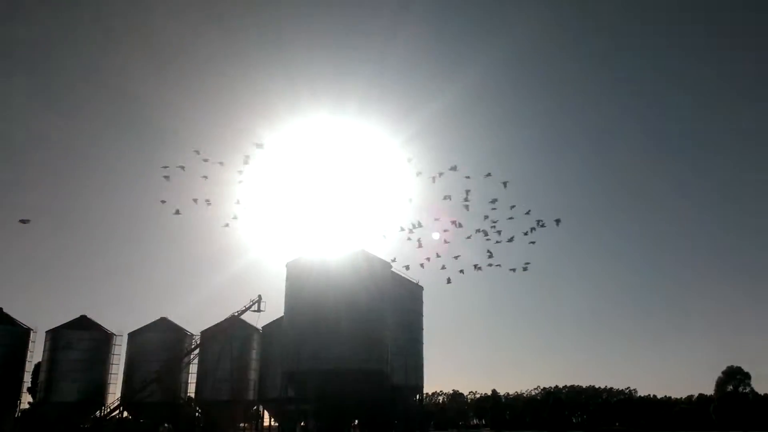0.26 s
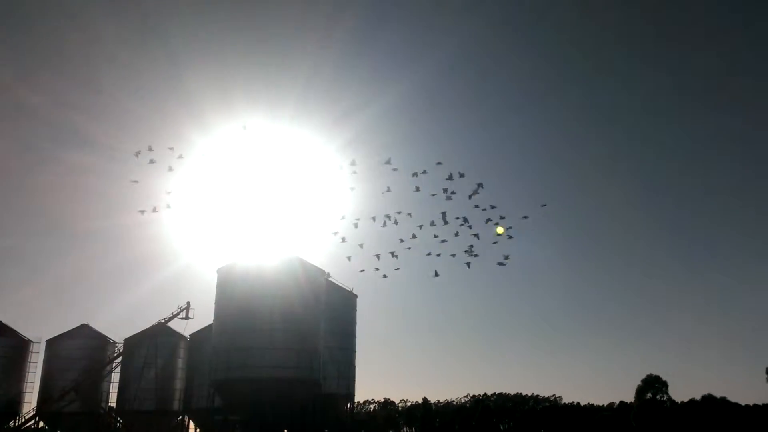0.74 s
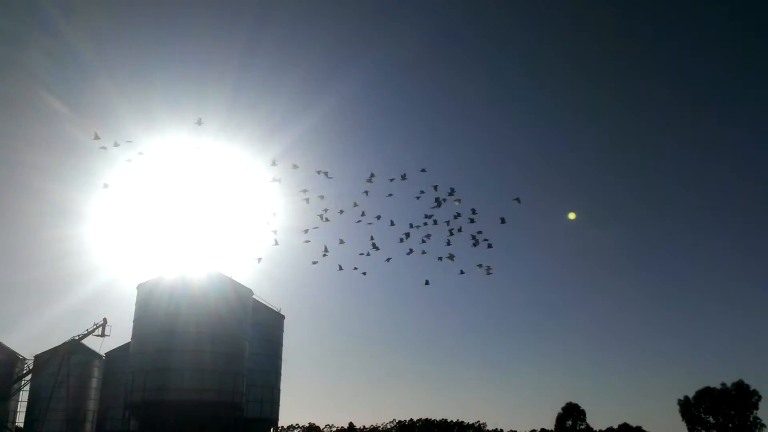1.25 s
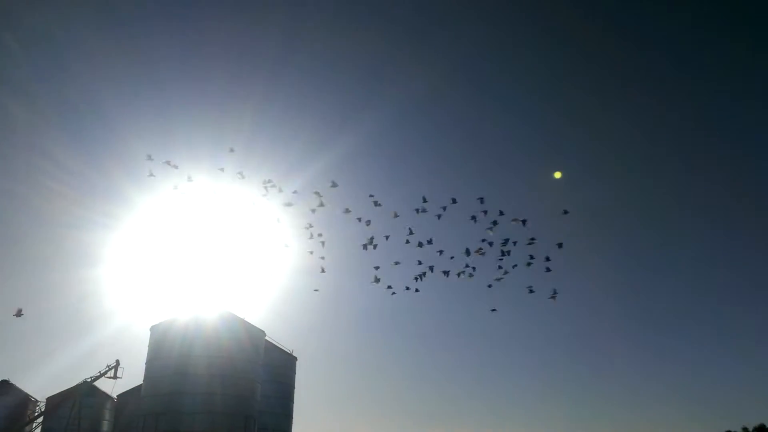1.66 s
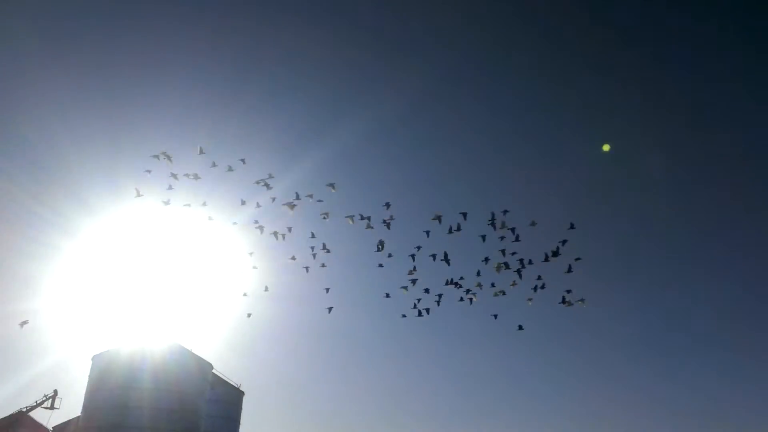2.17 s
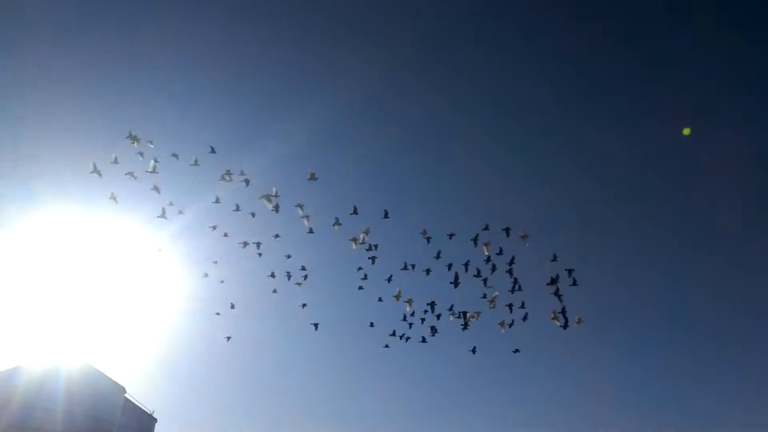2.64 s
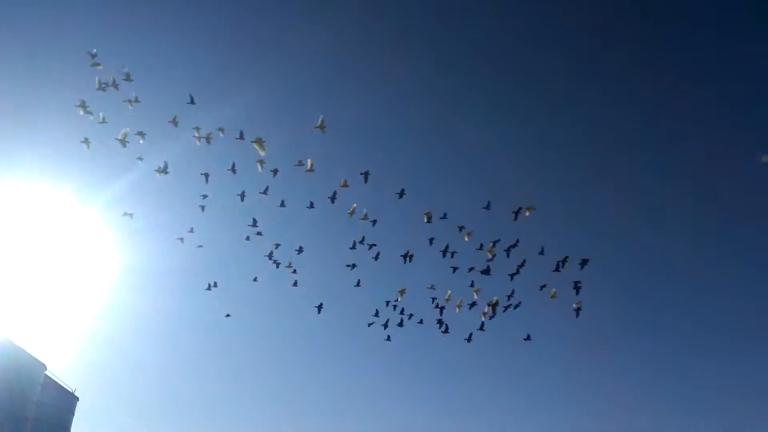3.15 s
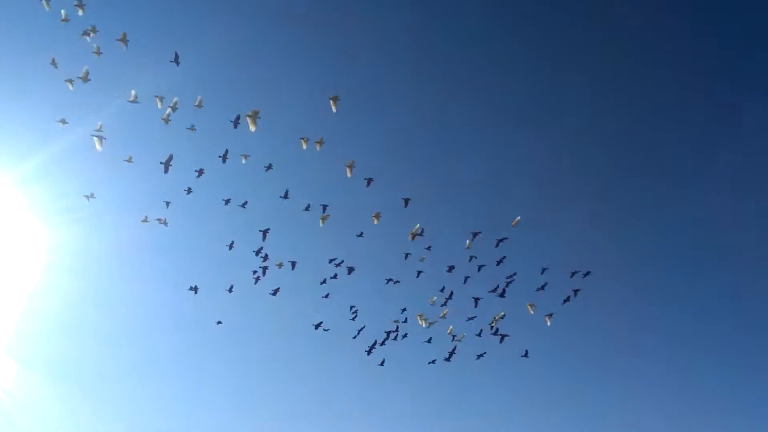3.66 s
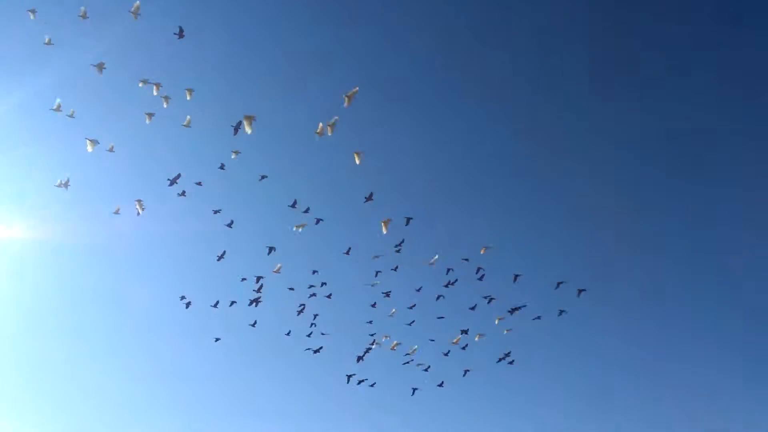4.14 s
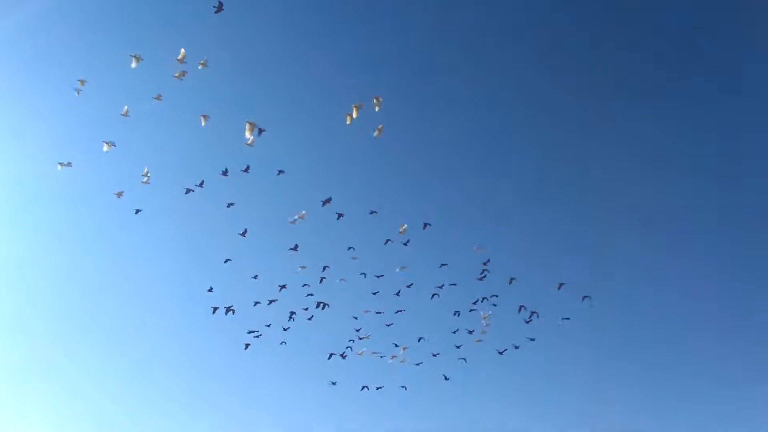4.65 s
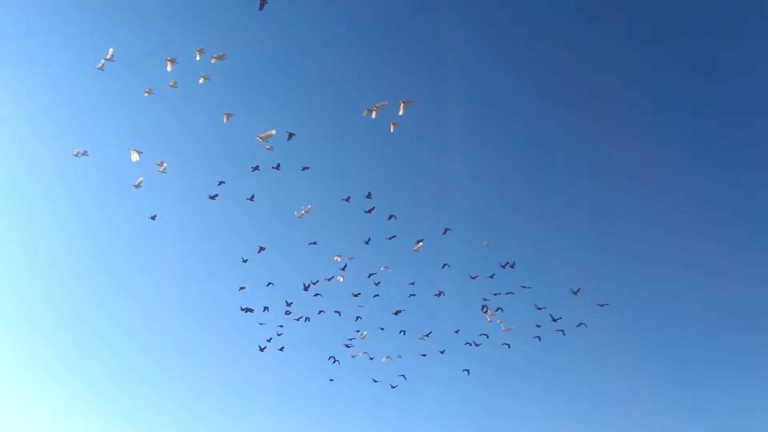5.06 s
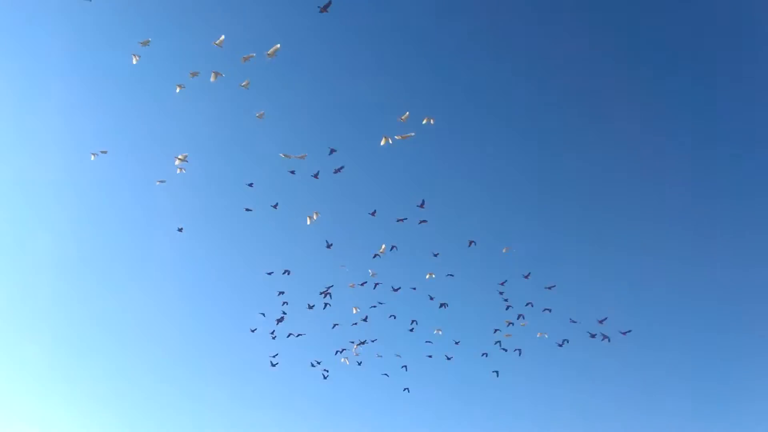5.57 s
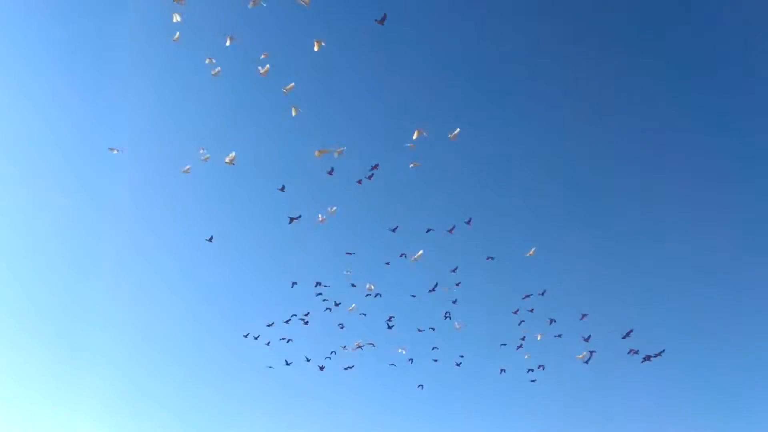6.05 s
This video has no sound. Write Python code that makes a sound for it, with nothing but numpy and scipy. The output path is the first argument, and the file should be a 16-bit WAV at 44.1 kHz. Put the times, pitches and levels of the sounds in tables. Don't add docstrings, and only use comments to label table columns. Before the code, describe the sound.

A dense flock of cockatoos calls continuously over open farmland, heard on a hand-held phone in gusty wind. From 0 s, quick high chirps, almost pure whistles, overlap with raspy, nasal squawks, while a distant crowd of both fills the gaps. Wind throbs and slaps the microphone in the first half second, then gusts hard at 0.9-1.4 s, with low fluttering rumble and blunt thumps. Faint handling ticks occur between 0.6 and 2.1 s. Around 2-2.5 s soft wing rustle lifts a little and another gust hits. From 2.7 to 3.8 s chirps cluster brightly against longer squawks as wind briefly eases near 3.2 s. Wind is strong again from 3.8 to 5.8 s, heaviest near 4.4 s, with sharp yelps around 5.1 and 5.8 s. It drops near 6 s, leaving chirps and squawks continuing to the abrupt end at about 6.3 s.

```python
import sys
import numpy as np
from scipy import signal
from scipy.fft import rfft, irfft, next_fast_len
from scipy.io import wavfile
from scipy.ndimage import uniform_filter1d

SR = 44100
rng = np.random.default_rng(int(sys.argv[2]) if len(sys.argv) > 2 else 0)


def inscribe(sig):
    pcm = np.round(np.clip(np.atleast_2d(sig).T, -1, 1) * 32767)
    wavfile.write(sys.argv[1], SR, pcm.astype(np.int16))


def ratio_of_db(decibels):
    return 10 ** (np.asarray(decibels, float) / 20)


N = 278209


def colour(x, points):
    hz, db = np.transpose(points)
    size = next_fast_len(N)
    log_hz = np.log(np.arange(1, size // 2 + 2) * SR / size)
    gain = ratio_of_db(np.interp(log_hz, np.log(hz), db))
    return irfft(rfft(x, size) * gain, size)[:N]


def unit(x):
    return x / np.sqrt(np.mean(x ** 2))


def noise(points):
    return unit(colour(rng.standard_normal(N), points))


def high_pass(x, order, cut_hz):
    return signal.sosfilt(signal.butter(order, cut_hz, "high", fs=SR, output="sos"), x)


def walk(rate_hz):
    hold = int(SR / rate_hz)
    held = np.repeat(rng.standard_normal(N // hold + 1), hold)
    slewed = uniform_filter1d(uniform_filter1d(held, hold), hold)
    return unit(slewed[:N])


def add(out, start_s, call, lag_s, bounce):
    for at_s, gain in ((start_s, 1), (start_s + lag_s, bounce)):
        i = int(at_s * SR)
        out[max(i, 0):max(i + len(call), 0)] += gain * call[max(-i, 0):max(N - i, 0)]


def machinery():
    # frequency in Hz, level in dB.
    drone = [(40, -18), (110, 10), (200, -2.5), (400, -41.5)]
    return ratio_of_db(-48) * noise(drone)


def hand_ticks():
    # start in seconds, peak level in dB.
    ticks = [
        (0.605, -55),
        (1.0051, -60.5),
        (1.8322, -52),
        (2.0887, -57),
    ]
    decay_s, cut_hz = .0006, 7000
    out, t = np.zeros(N), np.arange(200) / SR
    for s, db in ticks:
        burst = rng.standard_normal(len(t)) * np.exp(-t / decay_s)
        add(out, s, ratio_of_db(db + 9) * burst, 0, 0)
    return high_pass(out, 2, cut_hz)


def swish():
    # frequency in Hz, level in dB.
    feathers = [(6000, -30), (9500, -1), (13000, 0), (15600, -12)]
    peak_s, width_s, level_db = 0.44, 0.085, -59
    bell = np.exp(-((np.arange(N) / SR - peak_s) / width_s) ** 4)
    return ratio_of_db(level_db) * bell * noise(feathers)


def wings(wing_db):
    # frequency in Hz, level in dB.
    rustle = [(2000, -24), (5500, 2), (8000, -10), (11000, -24), (13000, -32), (15600, -33)]
    source, out = colour(rng.standard_normal(N), rustle), 0
    for hz in (3000, 6000, 8500, 11000, 13500):
        band = colour(source, [(hz / 1.6, -40), (hz / 1.15, 0), (hz * 1.15, 0), (hz * 1.6, -40)])
        out = out + band * ratio_of_db(3 * walk(12) + 2.8 * walk(40))
    return ratio_of_db(wing_db + 17) * unit(out)


def gusts():
    # peak in seconds, width in seconds, peak level in dB, bright edge in dB.
    swells = [(0.0, 0.057, -22.5, 4.5), (0.212, 0.015, -19.5, 9.5), (0.281, 0.19, -26, 5.5),
              (0.59, 0.97, -29, -37.5), (0.751, 0.17, -29, 4), (0.931, 0.061, -17.5, 0),
              (1.048, 0.06, -19, -3), (1.249, 0.11, -15.5, 2), (1.371, 0.23, -20.5, -8),
              (1.67, 0.12, -21.5, -7.5), (1.836, 0.044, -21, -7), (2.087, 0.28, -27.5, -0.5),
              (2.32, 0.2, -20, 0), (2.526, 0.063, -24, -0.5), (2.795, 0.3, -24.5, -8),
              (3.202, 0.16, -30.5, -9), (3.4, 0.052, -20, -35), (3.599, 0.24, -22.5, -12),
              (3.902, 0.26, -18.5, -4.5), (4.134, 0.17, -18, -7.5), (4.355, 0.11, -16, -6),
              (4.501, 0.19, -15, -4), (4.81, 0.41, -18.5, -10.5), (5.111, 0.19, -19, -11),
              (5.388, 0.19, -17, -7), (5.678, 0.42, -20, -4.5), (6.086, 0.13, -29, -10)]
    calm_db, calm_edge_db = -34, -43
    t = np.arange(N) / SR
    low, bright = ratio_of_db(2 * calm_db), ratio_of_db(2 * (calm_db + calm_edge_db))
    for s, width_s, db, edge_db in swells:
        bell = ratio_of_db(2 * db) * np.exp(-(2 * (t - s) / width_s) ** 2)
        low = low + bell
        bright = bright + ratio_of_db(2 * edge_db) * bell
    return 10 * np.log10(low) + 1.0, 10 * np.log10(bright / low)


def slaps():
    # start in seconds, peak level in dB, ring in Hz.
    eddies = [(0.176, -8, 405), (0.197, -3.5, 553), (0.22, -4, 455), (0.255, -4, 720), (0.277, -21, 525),
              (0.299, -7, 734), (0.324, -2.5, 740), (0.372, -5.5, 537), (0.535, -10.5, 540),
              (0.744, -3.5, 540), (0.774, -4.5, 950), (0.898, -3.5, 616), (1.164, -7.5, 665),
              (1.259, -2, 580), (2.242, -4, 530), (2.298, -7, 685), (2.759, -10, 580), (3.624, -7, 403),
              (3.856, -0.5, 534), (3.94, -4, 656), (4.102, -5.5, 410), (4.415, -2, 400), (4.478, -4, 665),
              (4.515, -0.5, 480), (4.602, -9, 490), (4.648, -3, 490), (5.139, -4.5, 472),
              (5.555, -10.5, 855), (5.609, -6, 560), (5.688, -5, 523), (0.667, -6.5, 525),
              (0.732, -16, 550), (0.905, -6.5, 880), (1.194, -0.5, 503), (1.212, -9, 596), (1.292, -6, 640),
              (1.357, -10, 406), (1.395, -26, 352), (1.543, -15, 490), (2.338, -11, 397),
              (2.377, -3.5, 540), (3.406, -14, 350), (3.831, -3, 430), (3.982, -5.5, 433), (4.627, -5, 427),
              (4.724, -3, 397), (4.78, -13, 463), (5.344, -15, 344), (5.422, -4, 363), (0.008, -4, 600),
              (0.03, -6.5, 356), (4.325, -9, 447), (4.362, -3.5, 563), (4.38, -4, 700), (4.537, -11, 730),
              (5.302, -3.5, 323), (5.465, -5, 580), (5.58, -8, 484), (1.678, -10, 500), (1.806, -10.5, 430)]
    rise_cycles, decay_cycles = .3, 1.37
    out, t = np.zeros(N), np.arange(int(.02 * SR)) / SR
    for s, db, hz in eddies:
        cycles = t * hz
        envelope = np.exp(-cycles / decay_cycles) * np.minimum(1, cycles / rise_cycles)
        add(out, s, ratio_of_db(db + 2.5) * np.sin(2 * np.pi * cycles) * envelope, .0035, -.6)
    return colour(out, [(100, -34), (350, -9.5), (900, -3), (1800, -9), (2100, -18), (3000, -60)])


def wind(gust_db, edge_db):
    # frequency in Hz, level in dB per Hz.
    rumble_points = [(15, -65), (25, 16), (64, -21.5), (165, -2.5), (361, 1.5), (502, -3.5), (574, -4.5),
                     (647, -8.5), (900, -20.5), (1170, -33), (1980, -120)]
    # frequency in Hz, level in dB.
    edge_points = [(500, 2), (900, 2), (1400, -11), (1950, -20), (2100, -51)]
    eddies = 1.6 * np.tanh(walk(70) / 1.6)
    rumble = noise(rumble_points) * ratio_of_db(2.26 * eddies + 0.95 * walk(25.16))
    edge = noise(edge_points) * ratio_of_db(3.3 * eddies + 11.0 * np.tanh(walk(160) / 2.2))
    rumble = ratio_of_db(gust_db - 2.5) * unit(rumble)
    edge = ratio_of_db(gust_db + edge_db - 6.0) * unit(edge)
    return rumble + edge + slaps()


def squawks(rows, waver, rasp_db, count=17):
    # frequency in Hz, level in dB.
    throat = [(600, -32.5), (1300, -5), (1600, -11), (1950, -12.5), (2150, 0), (2700, 0), (3200, -1),
              (4000, -2.5), (4800, -2), (5500, -11), (6200, -16), (8200, -22), (10000, -43), (13000, -76)]
    wobble = 1.8 * walk(34) + .85 * walk(500)
    rasp = walk(200)
    out = np.zeros(N)
    for (s, length_s, start_hz, middle_hz, end_hz, db), (a, b) in zip(rows, rng.random((len(rows), 2))):
        u = np.linspace(0, 1, int((length_s + 0.015) * SR))
        pick = int(a * (N - len(u))) + np.arange(len(u))
        arch_hz = np.polyval(np.polyfit([0, .5, 1], [start_hz, middle_hz, end_hz], 2), u)
        hz = arch_hz * (1 + waver * wobble[pick])
        half = np.pi * (np.cumsum(hz) / SR % 1)
        pulses = np.sin((2 * count + 1) * half) / (np.sin(half) + 1e-9) - 1
        swell = np.minimum(1, np.minimum(u / 0.14, (1 - u) / 0.17))
        call = ratio_of_db(db + rasp_db * rasp[pick]) * swell * pulses / np.sqrt(2)
        add(out, s - .008, call, .00025 + .0012 * b, .7)
    return colour(out, throat)


def chirps(rows, overtone_db, warble, throb):
    # frequency in Hz, level in dB.
    beak = [(6000, -17), (7000, 4.5), (7700, 2.5), (8600, -11.5), (9700, -4.5), (11500, -18), (14000, -29)]
    hook = 0.029
    out, over = np.zeros(N), np.zeros(N)
    for (s, length_s, start_hz, end_hz, db), (a, b, c) in zip(rows, rng.random((len(rows), 3))):
        u = np.linspace(0, 1, int((length_s + 0.00842) * SR))
        flutter = np.sin(2 * np.pi * ((60 + 200 * a) * u * length_s + b))
        glide_hz = start_hz + (end_hz - start_hz) * u ** 1.388
        hz = glide_hz * (1 + hook * (np.sin(np.pi * u) - .5) + warble * flutter)
        phase = 2 * np.pi * np.cumsum(hz) / SR
        swell = ratio_of_db(db - 7.5) * np.sin(np.pi * u) ** 0.43 * (1 + throb * flutter)
        add(out, s - .004, swell * np.sin(phase), 0.000976 + .006 * c, .4)
        overtones = np.sin(2 * phase) + ratio_of_db(-6) * np.sin(3 * phase)
        add(over, s - .004, ratio_of_db(11.6 * (c - 1.0)) * swell * overtones, .001 + .006 * c, .3)
    return out + ratio_of_db(overtone_db) * colour(over, beak)


def large_crowd():
    # frequency in Hz, level in dB.
    far_thin = [(1200, -0.5), (1950, -2.5), (2200, -1), (3300, 0), (6000, -2.5)]
    s, length, pitch, bend, arch, far = rng.random((360, 6)).T
    s = (np.arange(len(s)) + 2 * s) / len(s) * (N / SR + .1) - .15
    hz = 730 + 210 * pitch ** 1.5
    start_hz, middle_hz, end_hz = hz * (1 - .12 * bend), hz * (1 + .07 * arch), hz * (1 - .14 * arch)
    rows = np.transpose([s, .035 + .09 * length, start_hz, middle_hz, end_hz, -14 * far])
    return colour(unit(squawks(rows, waver=.014, rasp_db=3.5)), far_thin)


def small_crowd(overtone_db):
    s, length, pitch, spread, glide, far, high = rng.random((1300, 7)).T
    s = (np.arange(len(s)) + 6 * s) / len(s) * N / SR - .04
    is_high = high < .3
    hz = np.where(is_high, 4250, 3290) + 480 * (pitch + spread)
    start_hz, end_hz = hz * (1 + 0.0348 * glide), hz * (1 - 0.231 * (glide - .3))
    length_s, db = 0.00948 + 0.02545 * length ** 2, -16 * far - 5.6 * is_high
    rows = np.transpose([s, length_s, start_hz, end_hz, db])
    return unit(chirps(rows, overtone_db, warble=.009, throb=.35))


def crowd(squawk_db, chirp_db, overtone_db):
    large, small = large_crowd(), small_crowd(overtone_db)
    return ratio_of_db(squawk_db + 1.5) * large + ratio_of_db(chirp_db - 1.5) * small


def near_squawks():
    # start in seconds, length in seconds, peak pitch in Hz, slide start to end in %, level in dB.
    long_low = [(0.033, 0.11, 745, 2.5, -43), (0.567, 0.073, 753, -2.5, -41), (0.659, 0.095, 784, -8, -39),
                (0.683, 0.2, 776, -2.5, -44), (1.031, 0.048, 785, 4.5, -34.5),
                (1.081, 0.17, 778, 1.5, -39.5), (1.319, 0.13, 756, -11, -40.5),
                (1.57, 0.14, 775, -4.5, -42.5), (1.663, 0.13, 830, 8, -40), (2.117, 0.15, 738, -0.5, -39.5),
                (2.305, 0.15, 737, -1, -38.5), (2.554, 0.11, 784, 3.5, -39.5),
                (2.735, 0.16, 810, -5.5, -37.5), (2.922, 0.16, 756, -3, -41.5),
                (3.031, 0.25, 797, 1.5, -39.5), (3.61, 0.35, 787, 1.5, -39), (1.902, 0.17, 797, -2.5, -38),
                (4.003, 0.3, 752, -11, -45), (4.73, 0.16, 845, -0.5, -36), (4.684, 0.26, 767, -5.5, -37),
                (5.335, 0.19, 785, -2, -40), (5.85, 0.17, 778, 2, -35), (5.926, 0.14, 739, -1, -42),
                (6.16, 0.14, 738, -2.5, -42)]
    # start in seconds, length in seconds, peak pitch in Hz, slide start to end in %, level in dB.
    short_high = [(0.201, 0.12, 880, 7.5, -40), (0.287, 0.035, 906, -10.5, -43), (0.322, 0.14, 963, 3, -39),
                  (2.446, 0.076, 913, 12, -34.5), (2.747, 0.13, 897, 5.5, -43),
                  (2.871, 0.13, 820, 2.5, -39), (3.108, 0.11, 886, -2.5, -39),
                  (3.193, 0.1, 864, 1.5, -35.5), (1.87, 0.09, 723, -3.5, -49),
                  (4.224, 0.14, 874, -0.5, -38), (4.996, 0.11, 906, 0.5, -38),
                  (5.128, 0.11, 898, 2.5, -34.5), (5.195, 0.075, 907, -6.5, -41),
                  (5.279, 0.13, 836, 10, -40.5), (5.384, 0.18, 864, -10, -37.5),
                  (5.764, 0.074, 852, 6, -32), (5.899, 0.059, 816, -5.5, -43), (1.216, 0.099, 866, 7, -39),
                  (1.435, 0.059, 930, 4.5, -43), (1.397, 0.062, 775, -9, -49),
                  (4.158, 0.047, 914, 2.5, -39), (4.31, 0.084, 734, 3, -38), (4.427, 0.06, 729, -7, -39),
                  (5.976, 0.092, 978, -1.5, -39), (6.249, 0.057, 890, 0.5, -35)]
    arch = 0.03
    rows = []
    for s, length_s, hz, slide, db in long_low + short_high:
        start_hz, end_hz = hz * (1 - arch - slide / 200), hz * (1 - arch + slide / 200)
        rows.append((s, length_s, start_hz, hz, end_hz, db))
    return squawks(rows, waver=.011, rasp_db=3)


def near_chirps(overtone_db):
    # start in seconds, start pitch in Hz, level in dB.
    level = [(0.443, 3625, -26), (0.556, 4010, -15.5), (0.598, 4020, -17), (0.636, 3784, -17),
             (0.97, 4820, -17), (0.993, 4120, -11.5), (1.004, 3600, -13.5), (1.237, 3600, -42),
             (1.25, 4070, -15), (1.283, 4060, -33), (2.319, 4010, -23), (2.382, 3800, -24),
             (2.451, 4060, -15), (2.745, 4240, -15.5), (2.777, 4070, -32), (3.049, 4070, -14),
             (3.215, 3800, -12), (3.274, 3820, -12), (3.438, 3780, -14.5), (3.691, 3970, -29),
             (3.748, 3967, -8), (4.099, 3654, -13.5), (4.205, 4200, -15), (4.24, 3710, -16),
             (4.267, 3760, -27), (4.593, 3800, -23), (4.628, 3930, -16), (5.999, 3930, -31),
             (6.068, 3896, -19)]
    # start in seconds, start pitch in Hz, level in dB.
    falling = [(0.782, 3580, -15.5), (1.198, 4150, -17), (1.385, 3730, -16), (1.525, 3730, -17.5),
               (1.907, 4070, -14), (2.028, 3800, -46), (2.105, 3600, -15.5), (2.118, 4150, -17),
               (2.365, 4400, -13), (2.551, 4000, -14), (3.725, 4240, -11), (4.814, 3960, -39),
               (4.997, 3860, -14), (5.116, 3930, -17), (5.453, 4130, -17.5), (5.832, 4110, -15.5),
               (6.052, 4350, -16)]
    # start in seconds, start pitch in Hz, level in dB.
    rising = [(0.289, 3540, -22), (0.303, 3740, -15), (0.361, 3980, -18), (1.031, 4010, -12),
              (1.066, 4200, -16.5), (1.339, 3580, -15.5), (2.086, 3990, -19), (2.206, 3830, -22),
              (2.358, 3730, -28), (2.761, 3840, -18), (2.773, 3585, -29), (3.053, 3450, -22),
              (3.295, 3820, -24), (3.389, 3830, -12.5), (3.61, 4140, -14), (4.139, 3610, -22.5),
              (4.961, 3710, -16.5), (5.343, 3840, -16.5), (5.407, 3730, -24), (6.016, 3720, -19),
              (6.019, 4020, -17)]
    # start in seconds, start pitch in Hz, level in dB.
    diving = [(0.025, 4100, -24), (0.095, 3800, -37), (0.51, 7800, -31), (0.21, 2800, -32),
              (0.37, 5000, -35), (0.42, 5100, -20), (0.57, 6000, -25), (1.4, 4300, -22), (2.2, 4900, -40),
              (1.535, 2200, -43), (1.43, 7600, -36), (1.315, 6800, -31), (3.5, 1800, -25), (1.9, 4600, -13),
              (6.8, 5600, -27)]
    # start in seconds, level in dB, start pitch in Hz.
    low_chips = [(0.4519, -8.5, 3650), (0.5646, -19, 4050), (0.616, -6.5, 4150), (0.9233, -12, 4300),
                 (0.9657, -8, 4100), (1.0485, -19.5, 4160), (1.2067, -23, 3960), (1.2446, -13, 3680),
                 (1.2935, -5, 4180), (1.3414, -15, 3740), (1.5434, -9, 3490), (1.8726, -10, 3800),
                 (2.0418, -18, 3660), (2.0971, -20, 4120), (2.2258, -8, 4110), (2.3326, -20, 4150),
                 (2.374, -19, 4300), (2.4598, -11, 3930), (2.7901, -10, 4190), (2.8659, -14, 3750),
                 (2.9871, -13, 3320), (3.049, -6.5, 3560), (3.0964, -18, 3810), (3.2241, -21, 3720),
                 (3.2809, -9, 3680), (3.3268, -7.5, 3570), (3.4111, -20, 4050), (3.4446, -15, 3780),
                 (3.4994, -16, 3930), (3.5443, -15, 3500), (3.6182, -7.5, 4170), (3.7065, -9, 3975),
                 (3.7409, -15, 4030), (3.8172, -18, 3820), (3.9968, -30, 4050), (4.0317, -17, 3620),
                 (4.1071, -8, 3660), (4.147, -12, 3670), (4.1929, -9.5, 3990), (4.2527, -14, 3650),
                 (4.3061, -24, 3660), (4.5062, -7, 3960), (4.6034, -7.5, 3896), (4.6458, -13, 3850),
                 (4.6992, -22, 3960), (4.8314, -9, 4020), (4.9157, -13, 3660), (4.9576, -21, 3710),
                 (5.014, -10, 3630), (5.1352, -28, 3600), (5.4226, -14, 3790), (6.0038, -10, 3900),
                 (6.0332, -16, 3650), (6.0731, -6, 3870), (6.1739, -11.5, 3790)]
    # start in seconds, level in dB, start pitch in Hz.
    high_chips = [(0.2209, -22, 4760), (0.2738, -16, 4920), (0.3127, -16, 4700), (0.4269, -28, 4540),
                  (0.6045, -12, 4930), (0.7447, -25, 4680), (0.7971, -24, 4490), (0.9383, -18, 4770),
                  (0.9715, -11, 4640), (1.038, -11, 4680), (1.197, -10, 4820), (1.228, -17, 4840),
                  (1.283, -19, 4870), (1.3718, -6.5, 4880), (1.7564, -18, 4630), (2.0133, -23, 4810),
                  (2.291, -10.5, 5100), (2.369, -14, 4750), (2.4947, -31, 4820), (2.7945, -13, 4970),
                  (2.9841, -29, 4660), (3.029, -9, 4660), (3.0909, -13, 4640), (3.253, -8.5, 4650),
                  (3.322, -9, 4750), (3.3623, -13, 4780), (3.4308, -9, 4740), (3.7197, -9.5, 4840),
                  (3.931, -29, 4680), (4.0622, -32, 4910), (4.128, -13, 4790), (4.4737, -19, 4760),
                  (4.6648, -26, 4720), (4.7132, -11, 4530), (4.784, -15, 4600), (4.938, -23, 4750),
                  (5.447, -22, 4840), (5.6665, -32, 4770), (6.0207, -20, 4440), (6.0611, -19, 4450)]
    kinds = ((0.0314, -0.0095, level), (0.0327, -0.084, falling), (0.038, 0.0454, rising), (0.03, -0.19, diving))
    rows = []
    for length_s, slide, calls in kinds:
        rows += [(s, length_s, hz, hz * (1 + slide), db) for s, hz, db in calls]
    chip_s, chip_slide = 0.01695, -0.0666
    rows += [(s, chip_s, hz, hz * (1 + chip_slide), db - 6.5) for s, db, hz in low_chips + high_chips]
    return chirps(rows, overtone_db, warble=.008, throb=.4)


def scatter(x, wet_db, t60_s):
    t = np.arange(int(t60_s * SR)) / SR
    tail = rng.standard_normal(SR)[:len(t)] * np.exp(-t * np.log(1000) / t60_s)
    return x + ratio_of_db(wet_db) * signal.fftconvolve(x, tail / np.linalg.norm(tail))[:N]


def scene():
    # time in seconds, level in dB.
    large = [(0.0, -24.5), (0.23, -35), (0.68, -36.5), (0.72, -28.5), (0.91, -28), (1.12, -30), (1.93, -36),
             (2.49, -31), (2.71, -32), (2.91, -28.5), (4.32, -32), (4.62, -39), (4.81, -29), (5.06, -27.5),
             (5.17, -27.5), (5.69, -33.5), (5.82, -28.5), (6.31, -26)]
    # time in seconds, level in dB.
    small = [(0.0, -19), (0.07, -33), (1.26, -22.5), (1.62, -33), (2.14, -20), (2.32, -26.5), (2.34, -19),
             (2.71, -29.5), (2.79, -19), (2.97, -33.5), (3.06, -22.5), (4.36, -21.5), (4.43, -29),
             (5.01, -23.5), (5.2, -30.5), (5.97, -33), (6.03, -20.5), (6.31, -44)]
    # time in seconds, wing rustle in dB.
    beats = [(0, -64), (.2, -69), (.44, -68.5), (.6, -63.5), (1.4, -64.5), (1.6, -67), (2.05, -53),
             (2.25, -64.5), (2.37, -53), (2.6, -60), (2.8, -57.5), (3.0, -62.5), (4.3, -58), (4.57, -65),
             (4.9, -59), (5.52, -62), (5.63, -74), (5.85, -60)]
    t = np.arange(N) / SR
    squawk_db, chirp_db, wing_db = (np.interp(t, *np.transpose(c)) for c in (large, small, beats))
    close_db = wing_db - chirp_db
    overtone_db = -11.5 + .55 * (close_db - close_db.mean())
    birds = near_squawks() + near_chirps(overtone_db) + crowd(squawk_db, chirp_db, overtone_db)
    air = scatter(birds, wet_db=-18, t60_s=.18) + wings(wing_db) + wind(*gusts())
    return (air + swish() + machinery() + hand_ticks())[None]


def roll_off(x):
    return signal.sosfilt(signal.butter(12, 15670, fs=SR, output="sos"), x)


def record(dry):
    low_cut_hz, hiss_db = 141, -92
    cut = high_pass(dry, 3, low_cut_hz)
    cut = cut + ratio_of_db(hiss_db) * rng.standard_normal(dry.shape)
    soft = 1.2 * np.tanh(.85 * cut)
    return roll_off(soft)


dry = scene()
out = record(dry)
inscribe(out)
```